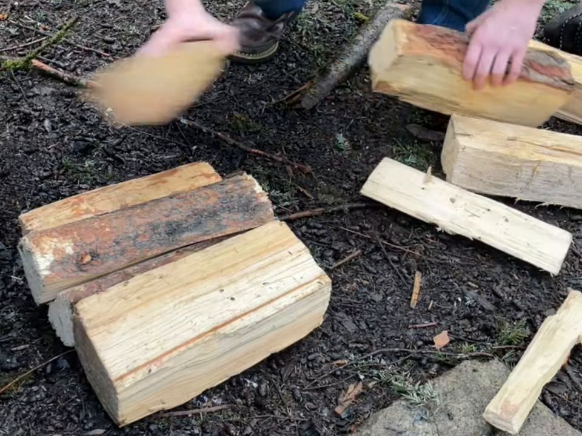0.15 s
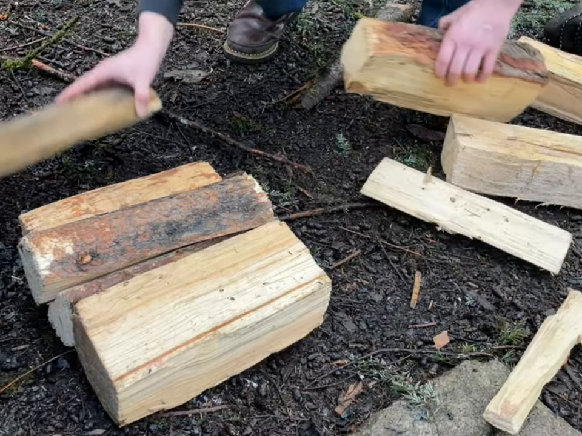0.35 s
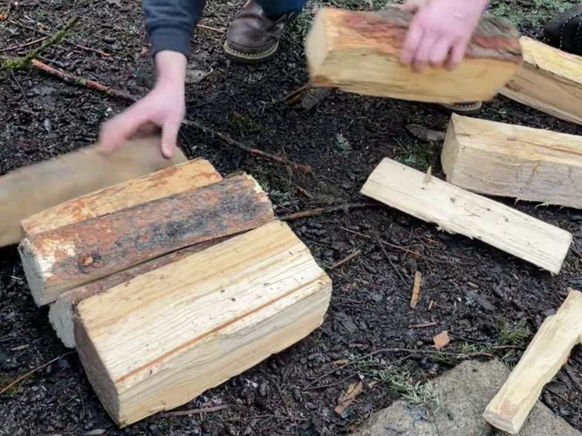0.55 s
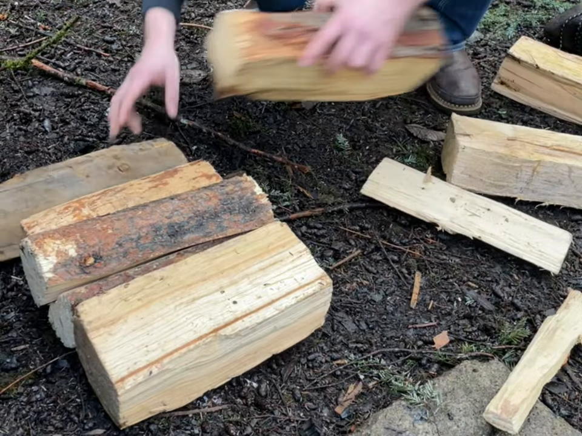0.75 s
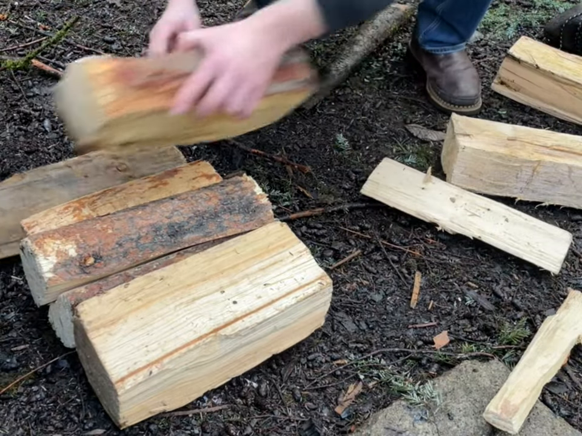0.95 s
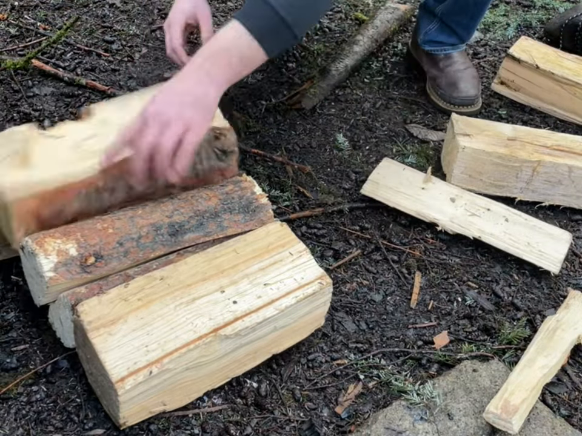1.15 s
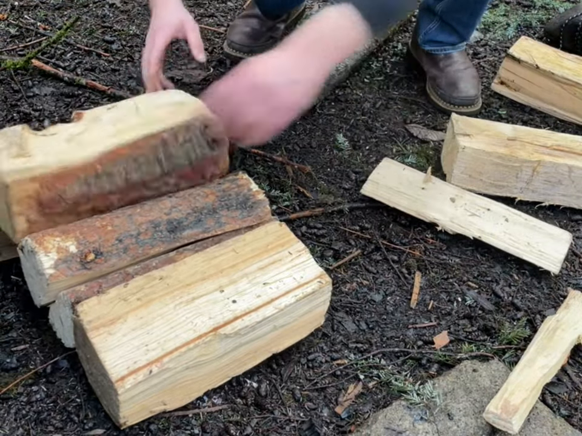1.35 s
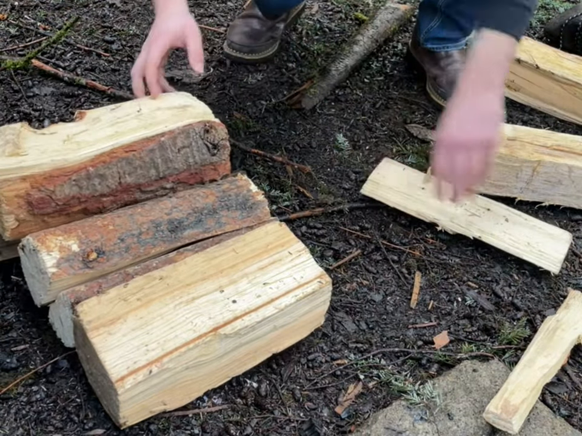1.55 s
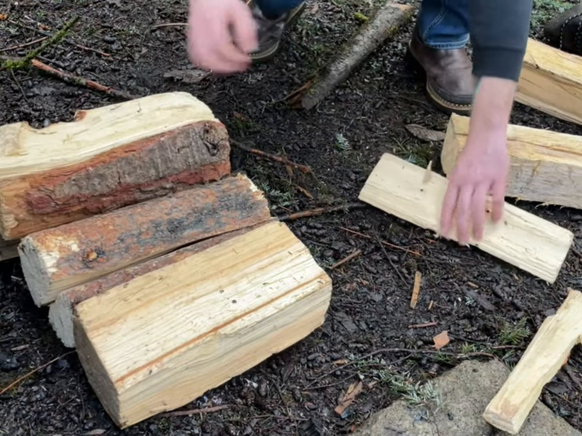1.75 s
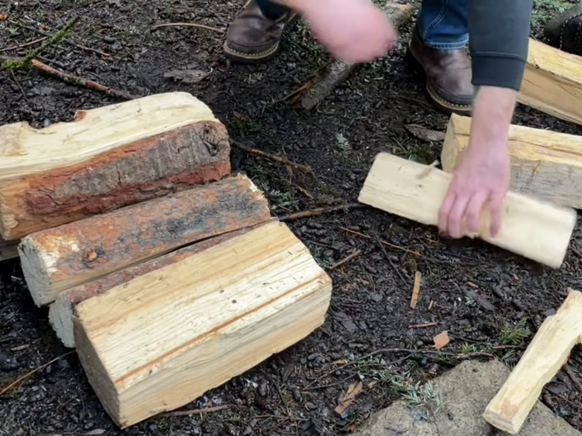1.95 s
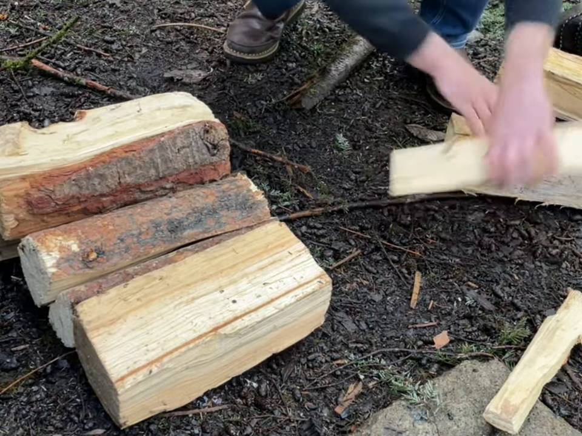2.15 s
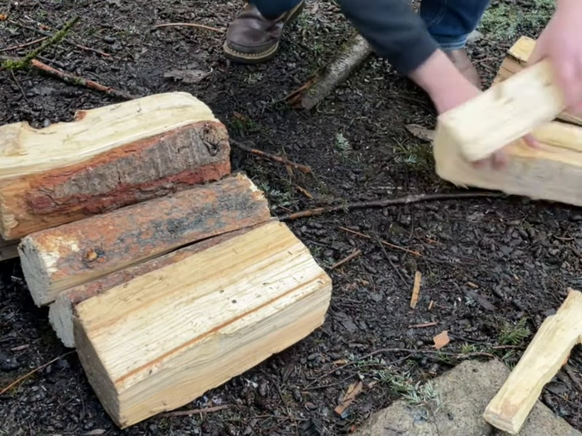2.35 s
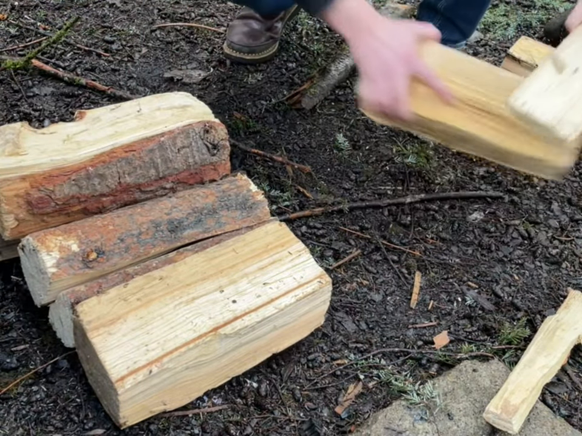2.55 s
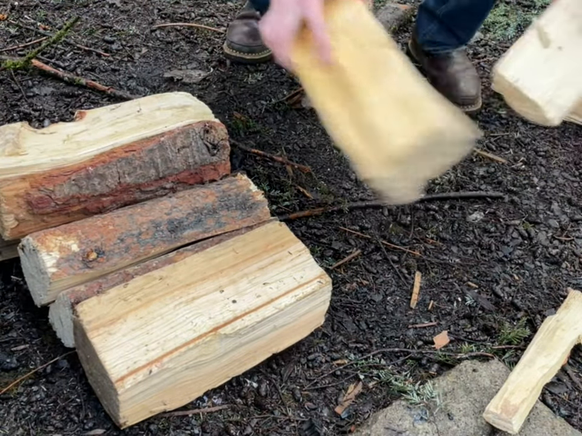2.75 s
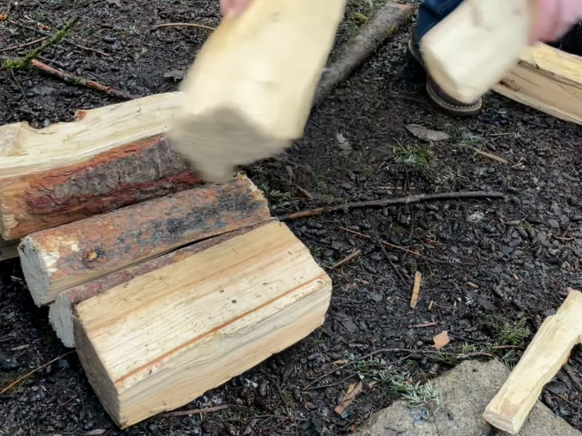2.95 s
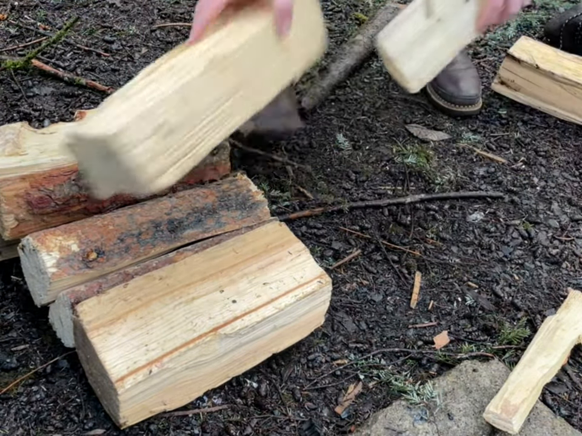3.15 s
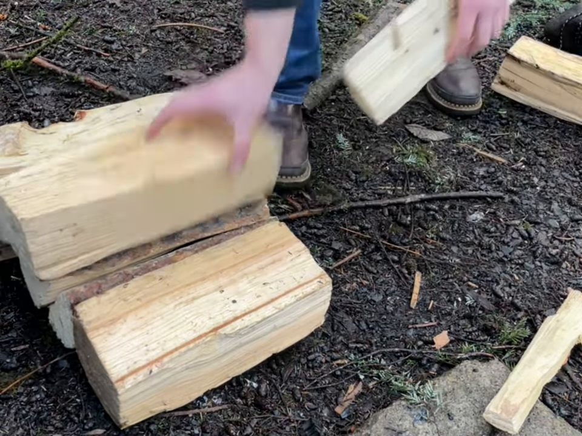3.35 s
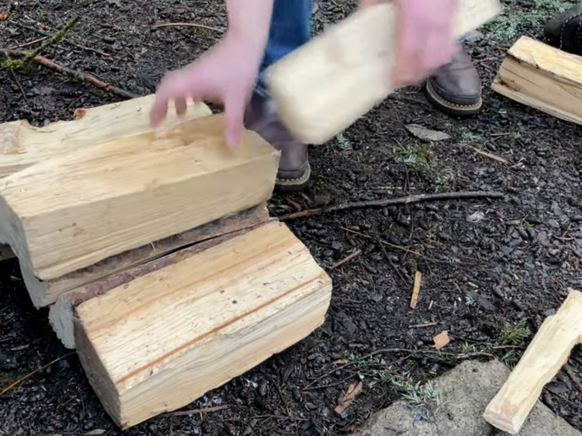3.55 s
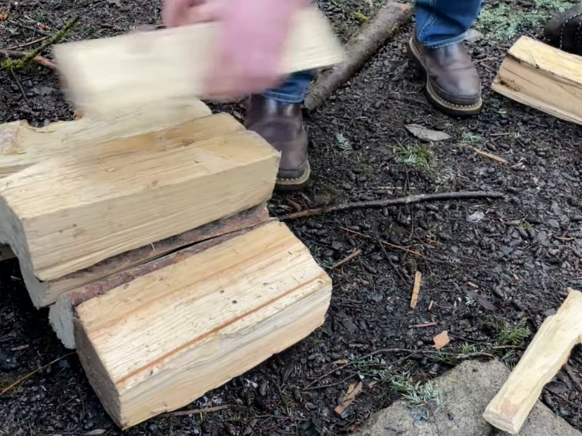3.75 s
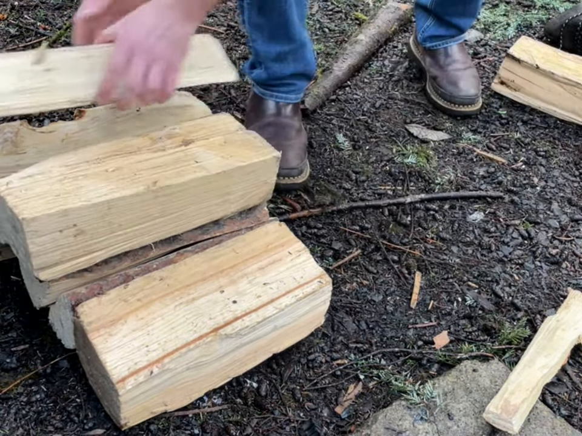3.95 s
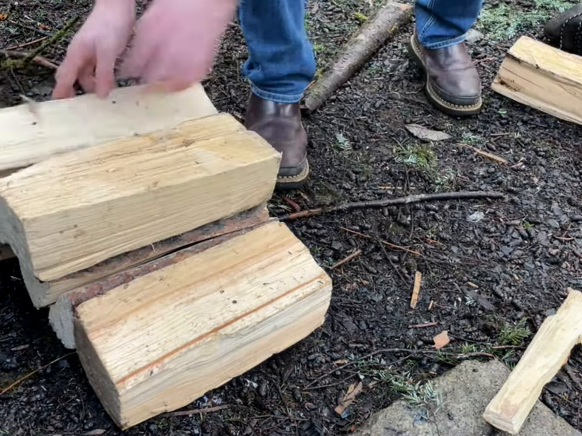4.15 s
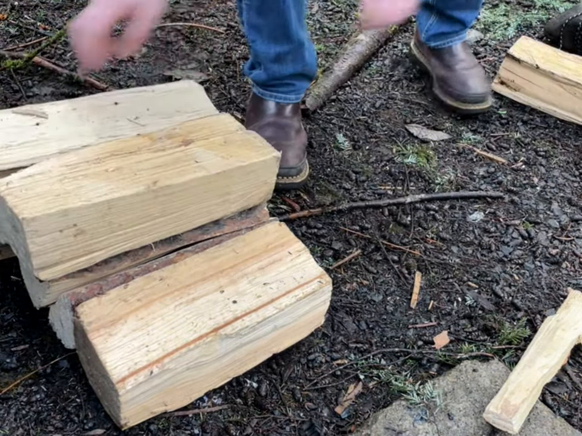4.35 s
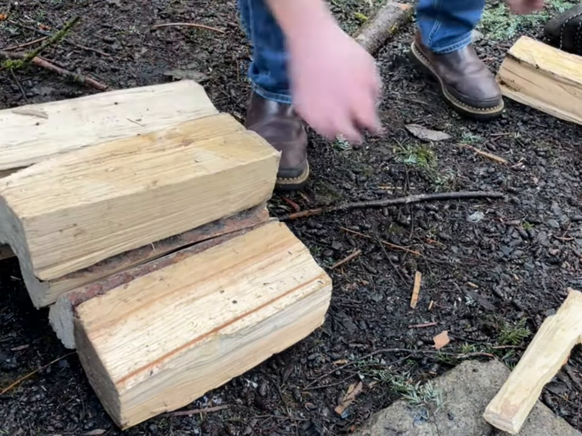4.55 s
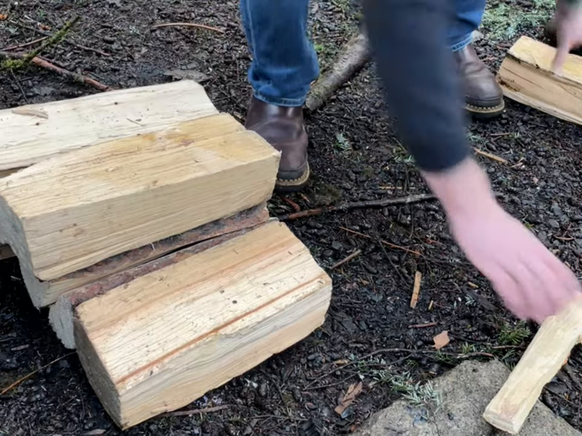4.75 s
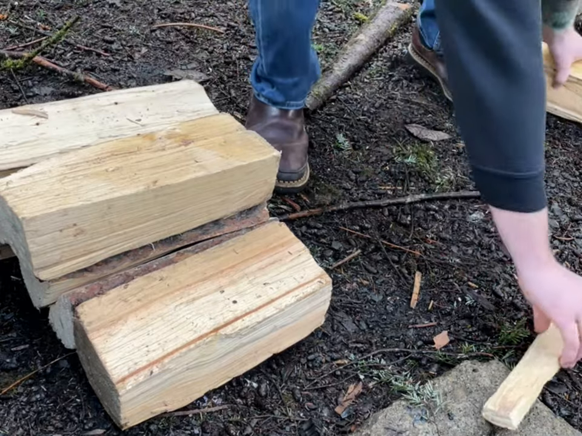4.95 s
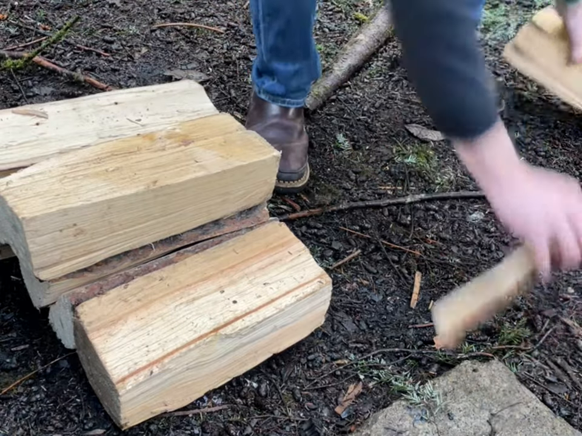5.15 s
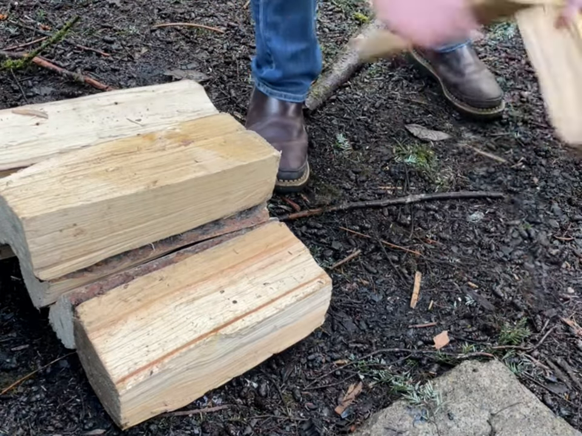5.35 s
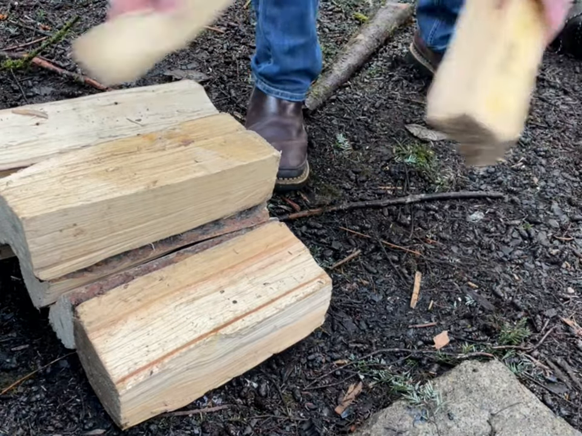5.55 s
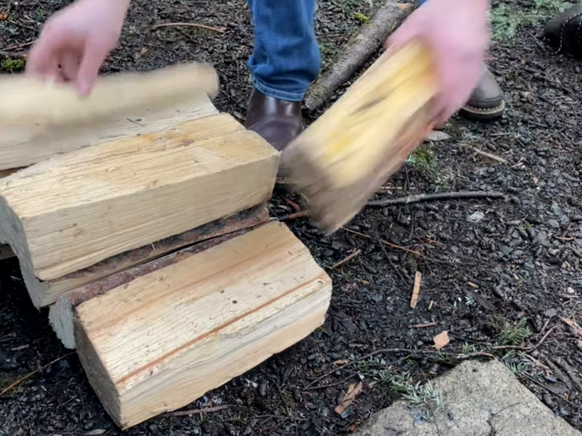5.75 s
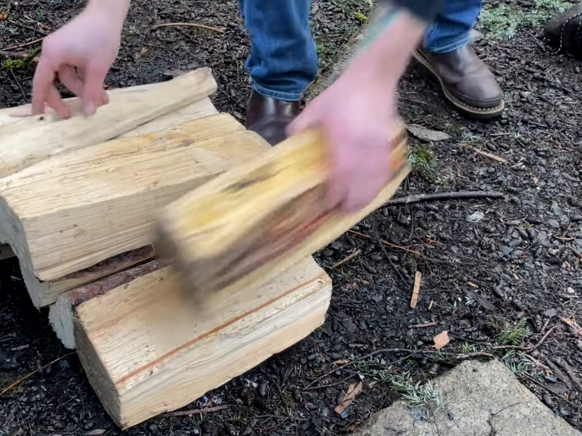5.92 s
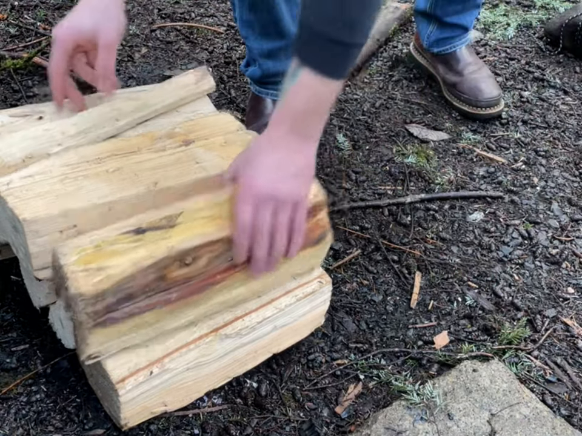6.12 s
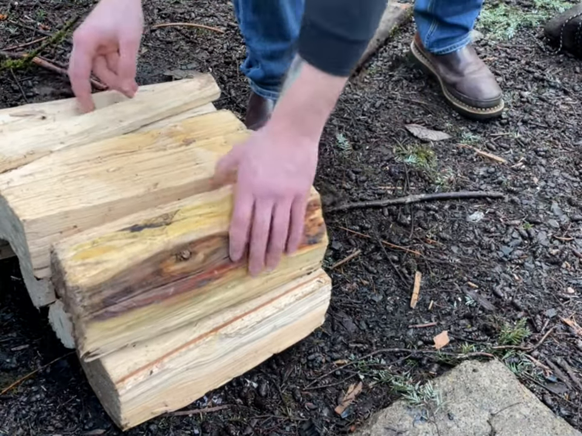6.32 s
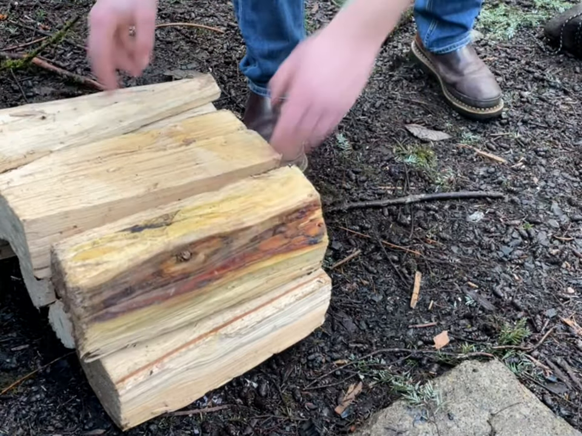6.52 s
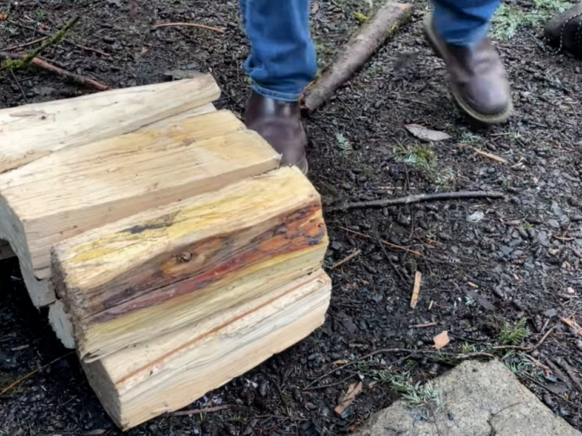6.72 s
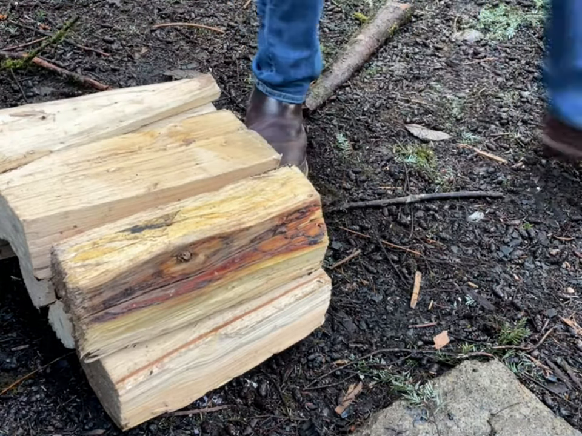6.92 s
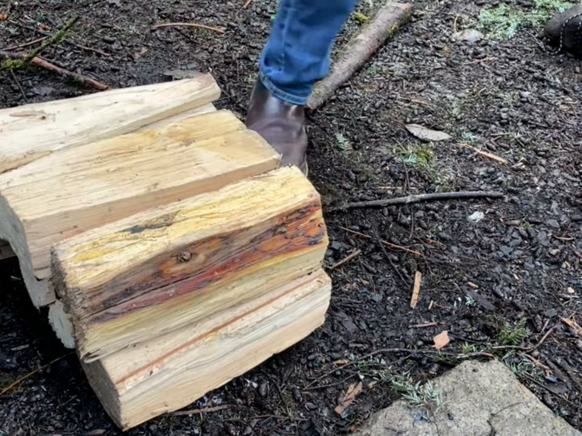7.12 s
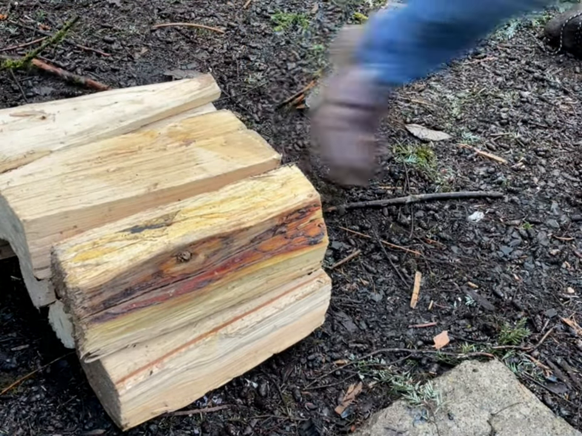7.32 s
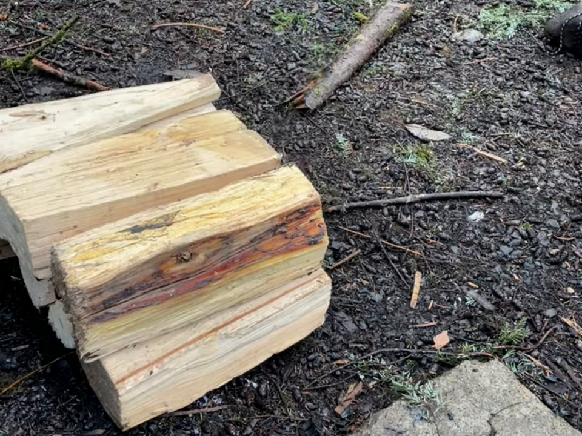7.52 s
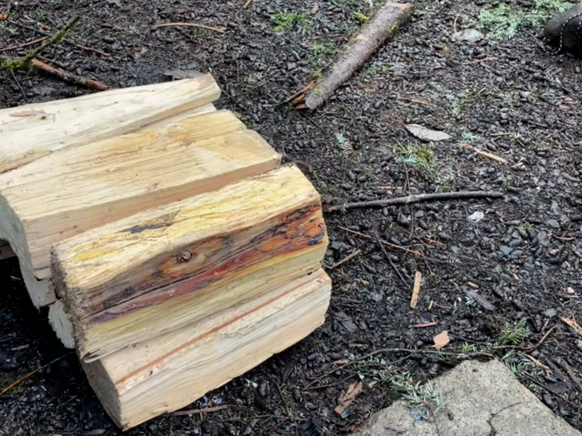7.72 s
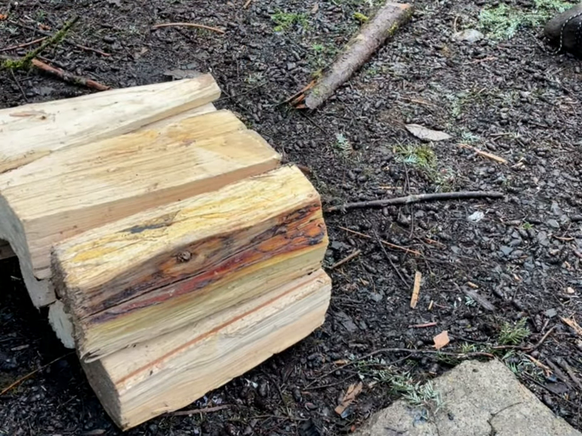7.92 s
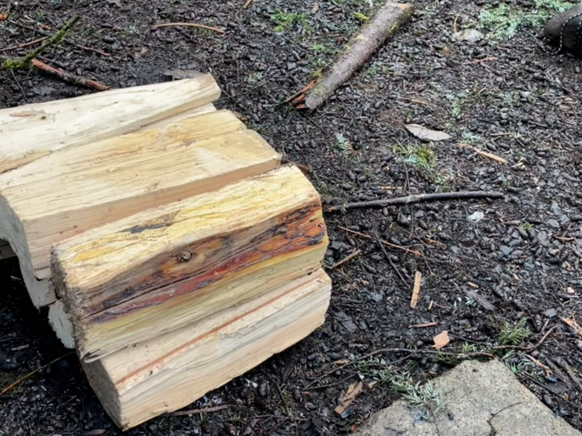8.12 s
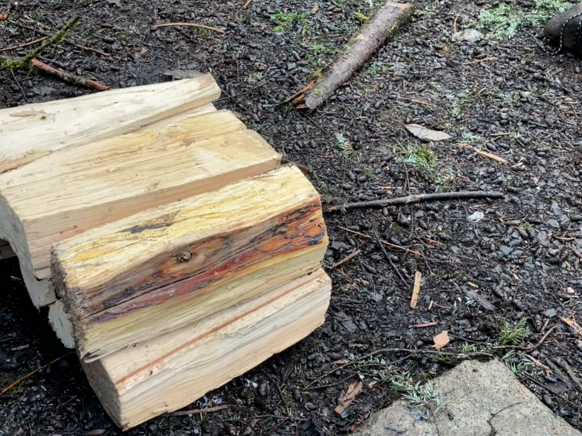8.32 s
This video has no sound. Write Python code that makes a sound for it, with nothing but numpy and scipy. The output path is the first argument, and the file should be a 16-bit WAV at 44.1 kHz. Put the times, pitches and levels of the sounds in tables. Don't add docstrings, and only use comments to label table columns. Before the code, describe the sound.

Split firewood pieces are set down one by one with dry, hollow wooden knocks, light rustles and ticks, over a faint distant wash outdoors.

```python
import sys
import numpy as np
from scipy import signal
from scipy.io import wavfile

SR = 44100
rng = np.random.default_rng(int(sys.argv[2]) if len(sys.argv) > 2 else 0)


def linear_from_db(decibels):
    return 10 ** (np.asarray(decibels, float) / 20)


def transcribe(signal):
    frames = np.atleast_2d(signal).T
    limited = np.clip(frames, -1, 1)
    pcm = np.round(limited * 32767).astype(np.int16)
    wavfile.write(sys.argv[1], SR, pcm)


N = 374004


def at_hz(points, hz):
    curve_hz, curve_db = np.array(points)[:, 0], np.array(points)[:, 1]
    return np.interp(np.log(hz), np.log(curve_hz), curve_db)


def rms_one(x):
    return x / np.sqrt(np.mean(x ** 2) + 1e-20)


def peak_one(x):
    return x / np.abs(x).max()


def dying(t60, count):
    return linear_from_db(-60 * np.arange(count) / (SR * max(t60, .001)))


def drift(rate):
    r = np.exp(-80 * np.pi * rate / SR)
    slow = signal.lfilter([1], [1, -2 * r, r * r], rng.standard_normal(N // 40 + 2002))[2000:]
    return np.interp(np.arange(N) / 40, np.arange(len(slow)), rms_one(slow))


def ring(force, hz, width):
    r, w = np.exp(-np.pi * width / SR), 2 * np.pi * hz / SR
    return signal.lfilter([0, np.sin(w)], [1, -2 * r * np.cos(w), r * r], force)


def add(out, s, x):
    i = round(s * SR)
    out[i:i + len(x)] += x[:N - i]


def bandpass(x, order, low, high):
    return signal.sosfilt(signal.butter(order, [low, high], "band", fs=SR, output="sos"), x)


def highpass(x, order, hz):
    return signal.sosfilt(signal.butter(order, hz, "high", fs=SR, output="sos"), x)


def banded(white, spectrum, patchy_db, rate):
    out, edges = 0, 24 * 2 ** np.arange(0, 9.6, 1 / 3)
    for k, (low, high) in enumerate(zip(edges, edges[1:])):
        if low > .8 * spectrum[0][0]:
            band = bandpass(white[k % 2], 2, low, high)
            level_db = at_hz(spectrum, np.sqrt(low * high)) + patchy_db * drift(rate)
            out = out + linear_from_db(level_db) * band
    return rms_one(out)


def swells(rows):
    t = np.arange(0, N, 64) / SR
    gain = sum(linear_from_db(db) * np.exp(-((t - s) / half) ** 2) for s, db, half in rows)
    return np.interp(np.arange(N) / SR, t, gain)


def touch(modes, noise, crack_db, softness_ms, chatter_s, chatter_db):
    contact_damping_hz, wood_loss = 65, .016
    count = len(noise[0])
    force = linear_from_db(chatter_db + 2.0) * noise[0] * dying(chatter_s, count)
    force[0] = 1
    r = np.exp(-1000 / (SR * max(softness_ms, .005)))
    force = signal.lfilter([1], [1, -2 * r, r * r], force)
    body = 0
    for k, (hz, width, db) in enumerate(modes):
        width = width + contact_damping_hz + wood_loss * hz
        drive = linear_from_db(db + noise[2, k]) * width * (1 + hz / 1500)
        body = body + (-1) ** k * drive * ring(force, hz, width)
    crush = noise[1] * dying(1.06 * chatter_s, count) * (1 - dying(0.00075, count))
    crack = bandpass(crush, 1, 1500, 5000)
    return peak_one(body) + linear_from_db(crack_db) * peak_one(crack)


def firewood():
    # (t/s, peak level/dB, crack over knock/dB, softness/ms)
    thin_split = [
        ([(560, 33, 0.5), (826, 200, -28), (1040, 100, -17), (1586, 76, 6.5), (1770, 45, 1), (2030, 70, -0.5), (2727, 45, 1.5), (3120, 97, -7.5), (3630, 120, -8.5), (4400, 150, -17), (4850, 200, -22), (6700, 300, -42)], [(.4996, -3, -9, 0.0082), (.502, -5, -24, 0.051), (.5045, -10, -27, 0.11), (.5088, -19, -14, 0.12), (.515, -30, -20, 0.56), (.527, -33, -14, .05)]),
        ([(526, 78, -9), (700, 55, -3), (1080, 60, -8.5), (1610, 58, -8), (1800, 51, -7), (2280, 140, -11), (2720, 83, -8.5), (3070, 51, -7), (3570, 35, -13), (4200, 49, -18), (5260, 64, -22), (5800, 64, -30)], [(.552, -22, -7, 0.07), (.557, -19, -14, 0.099), (.5625, -5.5, -15, 0.088), (.566, -12, -18, 0.14), (.571, -19.5, -25, 0.46), (.580, -23.5, -14, 0.072), (.606, -36, -20, .1), (.684, -33, -30, 0.31)]),
    ]
    barked_log = [
        ([(296, 770, 3), (530, 84, 6.5), (1120, 290, -7.5), (1740, 100, -8.5), (2190, 77, -14), (3770, 150, -7), (5110, 88, -13)], [(1.0935, -21, -21, 0.1), (1.0965, -19.5, -25, 0.3), (1.104, -28, -35, .5), (1.203, -23, -35, 0.6), (1.319, -29, -28, 0.4)]),
        ([(350, 70, -2.5), (540, 55, -4), (783, 28, -7), (1030, 46, -2.5), (1200, 70, -3.5), (1330, 45, -9), (1740, 130, -10.5), (2200, 60, -6), (2370, 120, -9), (2720, 120, -11), (3600, 200, -29), (4860, 300, -14), (6800, 300, -33)], [(1.125, -33, 0, 0.03), (1.129, -29, -13, 0.039), (1.139, -22, -16, .4), (1.1422, -12.5, -27, 0.47), (1.1452, -4, -16, 0.19), (1.1515, -21, -25, .25), (1.157, -23, -23, 0.11), (1.134, -28, -8, .05), (1.168, -30, -21, 0.25), (1.1485, -14.5, -22, 0.16)]),
    ]
    thick_billet = [
        ([(300, 78, -3), (490, 70, -5), (665, 43, -8), (940, 45, -9), (1780, 220, -10.5), (3820, 63, -8.5), (3870, 84, -32), (6260, 83, -28)], [(3.184, -30, -16, .31), (3.205, -25.5, -24, 0.28), (3.2175, -26, -3, 0.086), (3.269, -37, -2, 0.062), (3.3135, -27, -3, 0.4), (3.3175, -19.5, -16, 0.15), (3.321, -26, -12, .2), (3.326, -31, -19, 0.57)]),
        ([(300, 45, -12), (473, 51, -7.5), (640, 90, -9), (910, 70, -10), (1190, 60, -12), (1290, 40, 4.5), (1650, 110, -10.5), (2320, 70, -8), (2550, 67, -11), (3185, 120, -10.5), (3750, 150, -10), (4260, 200, -11), (6400, 270, -21), (7850, 300, -36)], [(3.347, -32, 0, 0.3), (3.354, -25, -7, 0.26), (3.364, -3.5, -8, 0.012), (3.3668, -3, -24, 0.12), (3.3691, -7.5, -13.5, 0.19), (3.3714, -12, -20, 0.16), (3.3744, -11, -18, 0.12), (3.378, -24, -22, .3), (3.384, -28, -22, 0.35)]),
    ]
    flat_slab = [
        ([(253, 130, -9), (715, 75, 8.5), (1390, 130, -5), (1930, 110, -11), (2200, 87, -8), (2460, 130, -4), (2750, 74, -19), (3600, 190, -22), (4230, 180, -27), (6350, 300, -15)], [(4.0858, -10, -11, 0.12), (4.0915, -20, -34, 0.78), (4.100, -29, -8, 0.15), (4.136, -26, -10, 0.7), (4.0886, -14, -12, .1)]),
        ([(269, 98, -1), (675, 90, -28), (1400, 430, -6.5), (1830, 98, 1.5), (2400, 110, 5), (3120, 280, -0.5), (4450, 500, -8), (4700, 110, -6.5), (3550, 250, 0), (5940, 91, -21), (6600, 300, -7)], [(4.114, -4.5, -13, 0.023), (4.1165, -16, -23, 0.083), (4.131, -26, -18, 0.082), (4.1485, -19, -22, 0.12)]),
    ]
    narrow_stick = [
        ([(361, 150, 0.5), (920, 130, -1.5), (1790, 170, -2), (3030, 100, 5.5), (3960, 69, -3), (4270, 110, -20), (4750, 96, -25), (5650, 79, -26), (8060, 170, -6)], [(5.7678, -16, -32, 0.072), (5.773, -31, 4, .088), (5.891, -33.5, -9, 0.065)]),
        ([(352, 97, -13), (517, 70, -8), (687, 20, -5), (915, 13, -1.5), (1390, 78, -10), (1750, 84, -13.5), (2520, 48, -9.5), (3100, 59, -14), (3300, 76, -10.5), (4100, 71, -16), (5230, 95, -29), (5870, 44, -18)], [(5.8035, -19.5, -32, 0.13), (5.8062, -19, -18, 0.4), (5.8145, -25.5, 1, 0.1), (5.8178, -15.5, -9, 0.11), (5.821, -26, -19, 0.1), (5.830, -26, -6, 0.17), (5.838, -34, -9, 0.25)]),
    ]
    resin_log = [
        ([(305, 51, -7), (462, 52, -1.5), (582, 44, 2.5), (794, 31, 0), (1080, 41, -6), (1530, 15, -1), (1870, 60, -13), (2070, 140, -10.5), (2870, 320, -12.5), (3440, 140, -10), (4300, 200, -20), (5230, 200, -22)], [(6.1155, -16, 1, 0.5), (6.119, -22, 0, 0.78), (6.123, -29, 5, 0.18), (6.1262, -2, -27, 0.17), (6.1327, -2, -17, 0.12), (6.1393, -9.5, -30, 0.12), (6.146, -25, -13, 0.19), (6.155, -21.5, -12, 0.12), (6.172, -32, 1, 0.046)]),
        ([(1380, 120, 1), (1900, 70, 0), (2540, 180, -17)], [(6.428, -27, -24, .03), (6.438, -26, -22, 0.044), (7.124, -33, 2, .02), (7.1995, -28, -38, 0.056), (7.218, -29, -40, 0.16), (7.187, -34, -30, 0.17)]),
    ]
    out = np.zeros(N)
    for modes, touches in thin_split + barked_log + thick_billet + flat_slab + narrow_stick + resin_log:
        for (s, db, crack_db, softness_ms), noise in zip(touches, rng.standard_normal(size=(10, 3, 4000))):
            chatter_db = -20 + 0.38 * crack_db - 0.55 * db
            chatter_s = 0.022 + 0.049 * softness_ms
            add(out, s, linear_from_db(db) * touch(modes, noise, crack_db, softness_ms, chatter_s, chatter_db))
    return highpass(out + 1e-18, 2, 150)


def thuds():
    # t/s, peak level/dB, f/Hz, t60/s
    soil_thumps = [(0.565, -24, 283, 0.088), (1.148, -33.5, 95, 0.093), (3.224, -23, 128, 0.086),
                   (3.369, -21, 270, 0.1), (4.091, -28, 163, 0.014), (5.809, -37, 101, 0.065),
                   (6.131, -29, 171, 0.08), (7.665, -30, 152, 0.045), (8.155, -28, 544, 0.063),
                   (8.165, -30.5, 131, 0.072), (7.051, -32.5, 704, 0.017), (8.025, -37, 655, .04)]
    out = np.zeros(N)
    for s, db, hz, t60 in soil_thumps:
        push = np.diff(np.r_[np.hanning(round(SR / hz)), np.zeros(8000)])
        add(out, s, linear_from_db(db) * peak_one(ring(push, hz, 5.2 / max(t60, .01))))
    return out


def ticks():
    # t/s, peak level/dB, f/Hz, t60/s
    twig_snaps = [(1.2505, -18, 17000, .003), (1.342, -18, 5000, .01), (7.9268, -17, 12500, .003),
                  (1.3425, -21, 3500, .014), (7.9415, -14, 7500, .0025), (7.933, -24, 12500, .003),
                  (4.5905, -36, 10200, .008)]
    # t/s, peak level/dB, f/Hz
    splinters = [(0.175, -29, 11400), (0.181, -31, 6500), (.386, -32, 6300), (.401, -25, 13500),
                 (0.421, -29, 8150), (.433, -32, 6380), (1.188, -29, 6300), (1.368, -40, 10700),
                 (1.47, -33.5, 9000), (2.0953, -34.5, 10200), (2.346, -30, 5440), (3.0573, -34, 5930),
                 (3.8831, -36, 7100), (3.954, -35, 11000), (4.004, -32, 8400), (4.4648, -30, 3600),
                 (.3454, -41, 13000), (5.009, -31, 13400), (5.207, -37, 13100), (6.0526, -29.5, 5670),
                 (4.832, -41, 10000), (7.031, -30, 13700), (7.659, -30, 7000), (7.694, -28.5, 5900),
                 (7.747, -34, 4500), (8.1533, -35, 6820), (7.157, -38, 11100), (8.278, -33, 5810),
                 (8.296, -31, 7060), (8.31, -26, 7740), (1.2776, -47, 12000), (1.318, -41, 11000),
                 (1.94, -45, 12000), (2.553, -46, 12100), (3.1743, -40, 12000), (3.351, -34, 13000),
                 (3.6532, -41, 13000), (3.899, -37, 9000), (4.031, -36, 7740), (4.169, -36, 9900),
                 (4.189, -40, 12000), (4.5696, -41, 10500), (4.973, -41, 13000), (5.803, -26, 11000),
                 (6.0812, -35, 8900), (7.081, -40, 12000), (7.104, -43, 11000), (7.146, -35, 3000),
                 (7.581, -39, 2630), (7.787, -36, 4000), (8.185, -41, 11000), (8.2358, -38, 8000),
                 (.203, -36, 8800)]
    tick_t60_s = 0.013
    events = list(twig_snaps) + [(*splinter, tick_t60_s) for splinter in splinters]
    out = np.zeros(N)
    for (s, db, hz, t60), noise in zip(events, rng.standard_normal(size=(60, 2000))):
        burst = noise * dying(t60, count=2000)
        burst[0] = 3
        broad = highpass(burst, 3, 0.4 * hz)
        broad = signal.sosfilt(signal.butter(1, min(1.3 * hz, 16000), fs=SR, output="sos"), broad)
        ringing = peak_one(ring(burst, hz, 0.1 * hz))
        add(out, s, linear_from_db(db) * peak_one(peak_one(broad) + 0.5 * ringing))
    return out


def slivers():
    # t/s, peak level/dB, f/Hz, t60/s
    pings = [(.5525, -31, 7500, .012), (.552, -29, 4300, .012), (.6025, -33, 4800, .01),
             (.602, -33, 3500, .012), (1.0938, -30, 3770, .012), (1.129, -27, 1500, .015),
             (1.344, -27, 4400, .012), (4.126, -27, 3050, .012), (4.149, -29, 3600, .01),
             (4.087, -33, 6400, .015), (4.988, -41, 4600, .02), (5.006, -41, 2750, .02),
             (5.057, -40, 2400, .02), (5.057, -43, 4600, .02), (5.8035, -21, 1370, .015),
             (6.1175, -30, 7800, .015), (.4995, -26, 6400, .01), (.528, -32, 3000, .012),
             (1.19, -36, 3200, .015), (7.271, -45, 12500, .015), (7.93, -35, 4500, .015),
             (7.659, -36, 1500, .012), (3.2175, -32, 2900, .015)]
    out = np.zeros(N)
    for (s, db, hz, t60), noise in zip(pings, rng.standard_normal(size=(30, 2000))):
        slips = ring(noise * dying(.6 * t60, count=2000), hz, 4.0 / t60)
        add(out, s, linear_from_db(db) * peak_one(ring(slips, hz, .3 * hz)))
    return out


def rustle():
    # t/s, level/dB
    busyness = [(0.0, -68), (.4, -54.5), (.9, -61), (1.25, -53.5), (1.9, -65), (2.9, -56.5), (3.66, -61),
                (4.04, -55), (4.3, -58.5), (5.15, -55.5), (5.48, -63.5), (6.31, -55), (7.75, -64.5),
                (8.03, -58), (8.48, -77)]
    # f/Hz, level/dB per Hz
    cloth_colour = [(1200, 7.5), (3000, 7), (6000, 3.5), (9000, 1.5), (13500, -5.5), (16000, -2)]
    # middle t/s, level/dB, half length/s
    brushes = [(.186, -49, 0.021), (.413, -54, .041), (.54, -43, 0.038), (.646, -51, 0.042),
               (1.06, -44.5, 0.012), (1.15, -50, 0.058), (1.346, -38, 0.0081), (1.9, -48, 0.014),
               (2.34, -51, 0.031), (3.48, -52, 0.013), (3.706, -52, 0.018), (4.017, -52, 0.009),
               (1.768, -51, .006), (5.823, -53, 0.055), (6.425, -45.5, 0.019), (7.084, -56, 0.076),
               (7.72, -53.5, 0.14), (7.94, -47, 0.0096), (8.163, -52, .016), (8.3, -50, 0.098),
               (3.195, -50, .02), (4.228, -56, .012), (2.96, -60, 0.026), (2.21, -58, .02),
               (5.32, -62, .05), (1.225, -66, .015)]
    # middle t/s, level/dB, half length/s
    scuffs = [(2.35, -60, .02), (5.007, -50, 0.008), (6.42, -71, 0.037), (7.14, -56, 0.13),
              (7.71, -46, 0.044), (8.16, -70, .02), (8.3, -46, 0.074)]
    level = linear_from_db(np.interp(np.arange(N) / SR, *np.transpose(busyness)) - 0.5) + swells(brushes)
    sizes = linear_from_db(4.3 * np.minimum(rng.exponential(1, (2, N)), 5)) * rng.choice([-1, 1], (2, N))
    clumps = .3 * linear_from_db(.8 * drift(60))
    grains = sizes * (rng.random((2, N)) < clumps)
    cloth = level * banded(grains, cloth_colour, patchy_db=2.2, rate=12)
    grit = bandpass(grains[0, ::-1], 1, 1300, 5000)
    return cloth + swells(scuffs) * rms_one(grit)


def peep():
    # start t/s, end t/s, from f/Hz, to f/Hz, level/dB
    call = (7.87, 8.03, 13300, 10300, -66)
    start, end, from_hz, to_hz, db = call
    out = np.zeros(N)
    hz = np.linspace(from_hz, to_hz, round((end - start) * SR))
    tone = np.sin(2 * np.pi * np.cumsum(hz) / SR)
    add(out, start, linear_from_db(db) * np.hanning(len(hz)) ** .5 * tone)
    return out


def yard(x):
    t60_s, tail_db = .3, -34
    tail = signal.lfilter([.4], [1, -.6], rng.standard_normal(12000)) * dying(t60_s, count=12000)
    tail = np.r_[np.zeros(200), tail / np.sqrt(np.sum(tail ** 2))]
    return x + linear_from_db(tail_db) * signal.fftconvolve(x, tail)[:N]


def distance():
    # f/Hz, level/dB per Hz
    wash_colour = [(25, -33), (47, -27), (80, -0.5), (1130, 0.5), (5280, -13), (10700, -28.5),
                   (14000, -31.5), (16000, -52)]
    # multiple of the idle rate, rms level/dB, wander/dB
    idle_orders = [(2, -59.5, 0.5), (3, -70, 4.2), (3.5, -73, 4), (4, -66, 4)]
    wash_db, idle_hz = -44.5, 34.8
    wash = banded(rng.standard_normal((2, N)), wash_colour, patchy_db=1.0, rate=2.5)
    turns = np.cumsum(idle_hz * (1 + 0.00585 * drift(0.64))) / SR
    idle = np.zeros(N)
    for k, db, wander_db in idle_orders:
        level = linear_from_db(db + wander_db * drift(0.41))
        idle += level * np.sqrt(2) * np.sin(2 * np.pi * k * turns)
    return linear_from_db(wash_db) * wash + idle


def scene():
    near = yard(firewood() + ticks())
    return (near + thuds() + rustle() + peep() + distance() + slivers())[None]


def band_limit(x):
    return signal.sosfilt(signal.butter(12, 16960, fs=SR, output="sos"), x)


def record(dry):
    x = dry / (1 + np.abs(dry / .92) ** 6) ** (1 / 6)
    x = highpass(x, 5, 56)
    x = signal.sosfilt(signal.ellip(9, .2, 45, 15650, fs=SR, output="sos"), x)
    return band_limit(x)


dry = scene()
out = record(dry)
transcribe(out)
```